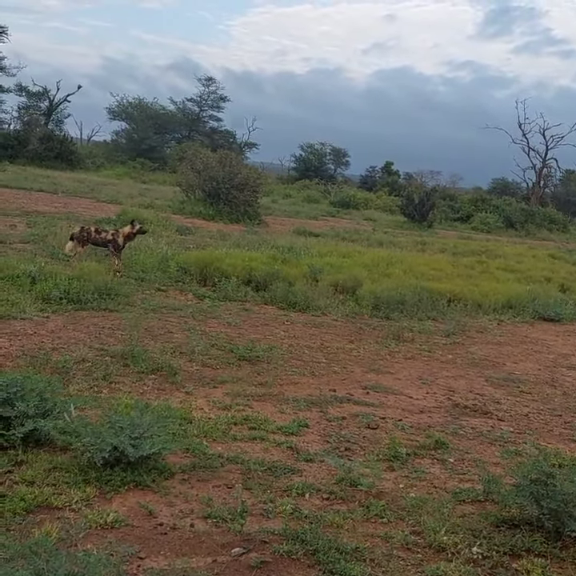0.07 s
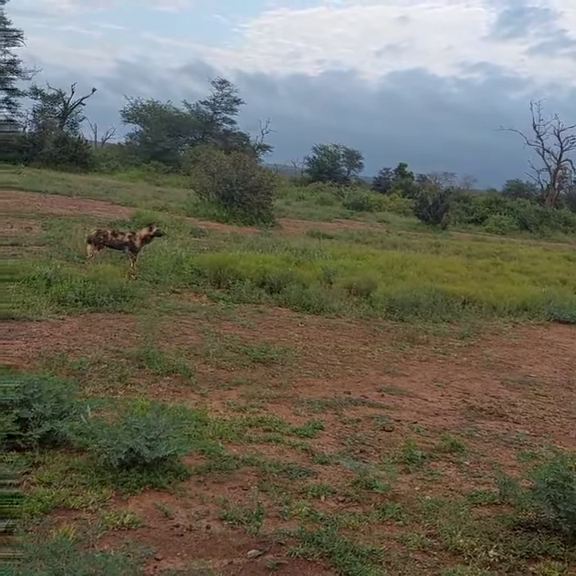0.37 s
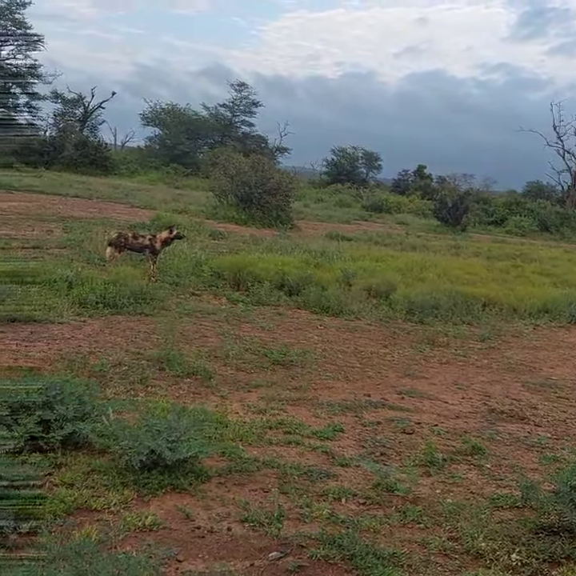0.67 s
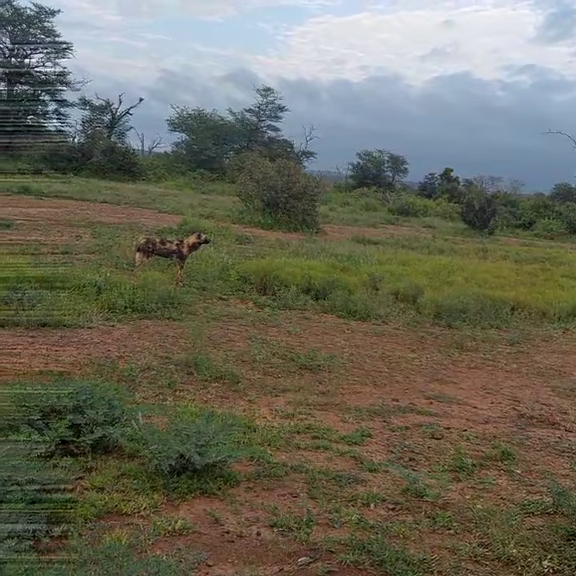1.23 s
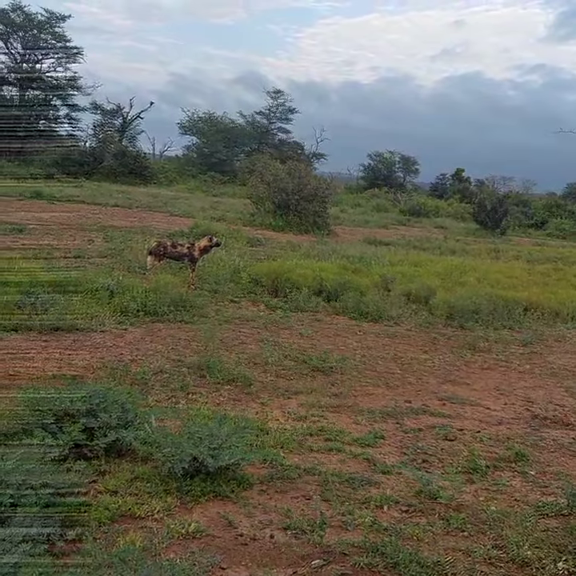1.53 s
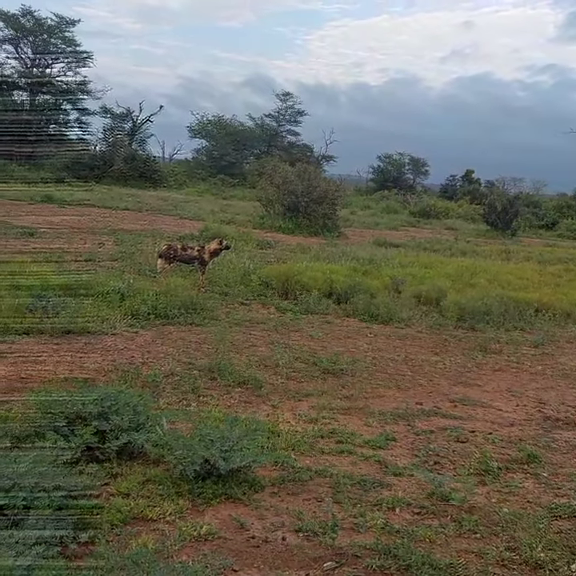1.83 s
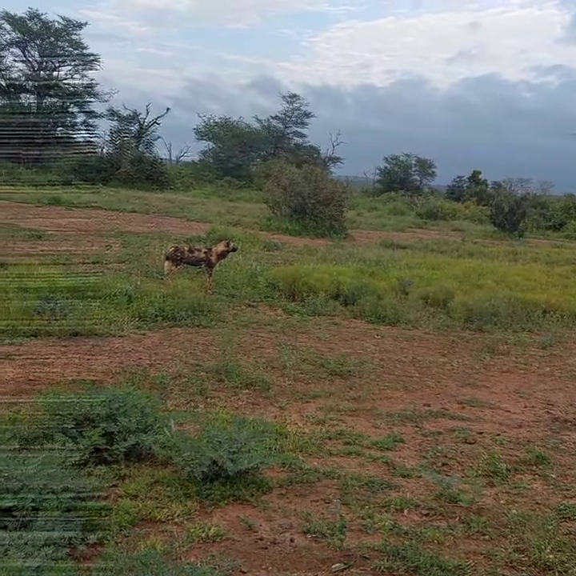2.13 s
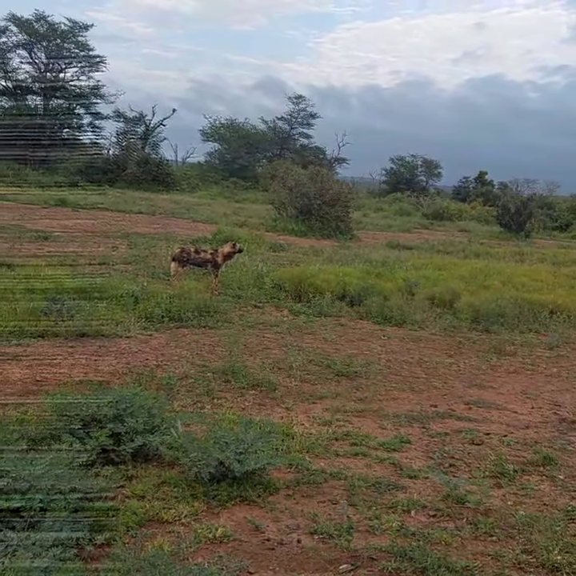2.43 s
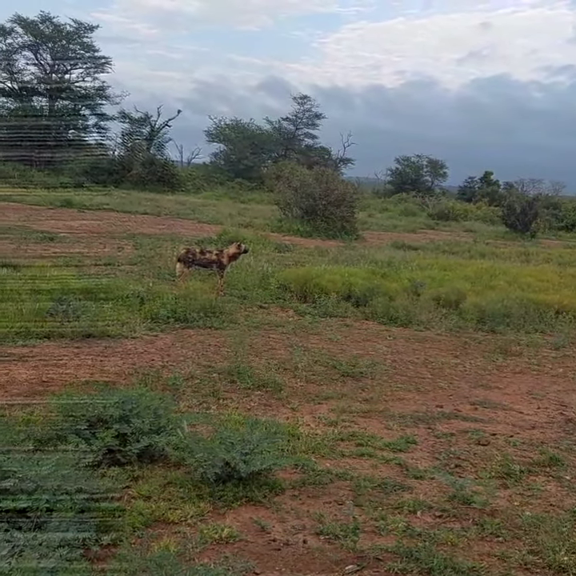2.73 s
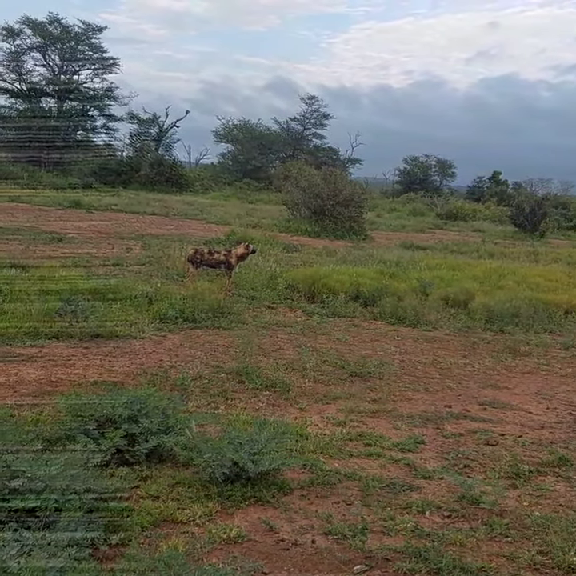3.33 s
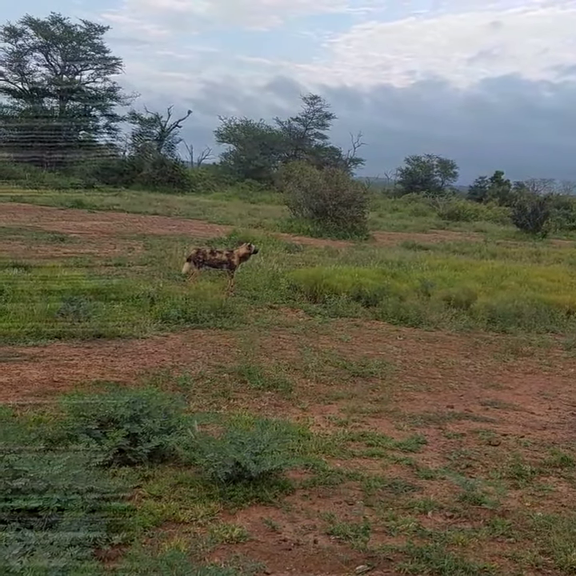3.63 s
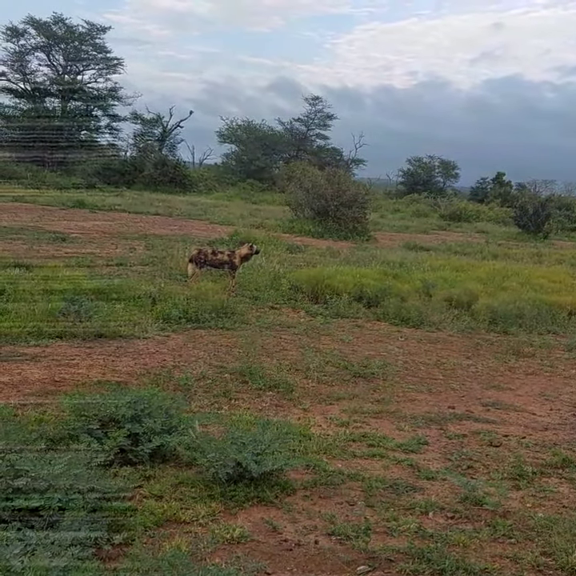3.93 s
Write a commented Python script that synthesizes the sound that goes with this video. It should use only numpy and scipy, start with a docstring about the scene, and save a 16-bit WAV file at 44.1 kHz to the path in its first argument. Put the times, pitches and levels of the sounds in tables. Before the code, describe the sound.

Birds chirp and whistle all around an open grassy plain. Soft ticks come first, then a held note, a warble and a raspy scolding run, while distant birds twitter and low wind buffets the microphone in gusts.

```python
"""Open savanna, on a camera microphone, with small birds near and far and light gusts on the right port.
Thin falling whistles come from all around. One bird buzzes and chucks, one scolds from deep in a bush,
and on the right one ticks and one holds a note and warbles. Bushes scatter each call, trees echo it.
Further out are low pips, a faint coo and two twittering flocks, over the steady hush of the air."""
import sys
import numpy as np
from scipy import signal
from scipy.fft import rfft, irfft
from scipy.io import wavfile
from scipy.ndimage import uniform_filter1d

SR = 44100
rng = np.random.default_rng(int(sys.argv[2]) if len(sys.argv) > 2 else 0)


def wrap_up_sound(samples):
    """Save the sound to the file named by the first command line argument, as 16-bit audio."""
    columns = np.atleast_2d(samples).T
    # keep every value between -1 and 1, then stretch to whole-number steps
    tamed = np.clip(columns, -1, 1)
    steps = np.round(tamed * 32767).astype(np.int16)
    wavfile.write(sys.argv[1], SR, steps)


N = 176400
TURN, TIME, HZ = 2 * np.pi, np.arange(N) / SR, np.fft.rfftfreq(N, 1 / SR)
PORT_LEAD_S = 6e-5  # a call from the left reaches the left port this much sooner

# The hush of the plain. Each row: frequency in Hz, relative spectral level in dB.
AIR_SPECTRUM = [(25, -9), (250, -0.5), (400, -6.5), (600, -5), (800, -9), (1400, -12.5), (2800, -15.5),
                (4000, -12), (5200, -27.5), (6300, -19.5), (9000, -20.5), (15500, -25)]
# How alike the two ports hear that hush. Each row: frequency in Hz, correlation from 0 to 1.
AIR_LIKENESS = [(500, 0.43), (1500, 0.25), (6000, 0)]
# Two far flocks, high then low. Each row: middle pitch in Hz, spread in octaves.
FLOCK_PITCHES = [(5076, 0.094), (2735, 0.18)]
# The flocks come and go. Each row: time in seconds, high flock's level in dB, low flock's level in dB.
FLOCK_LEVELS = [(.3, -79, -77), (1.098, -75, -78), (1.8, -77.5, -85), (2.75, -77.5, -79.5), (3.6, -86, -82),
                (3.9, -86, -78)]
# Gusts on the microphone. Each row: start in seconds, length in seconds, relative level in dB.
GUSTS = [(0.036, 0.089, -38.5), (0.126, 0.082, -39), (0.236, 0.17, -35.5), (0.416, 0.13, -39.5),
         (0.484, .065, -36.5), (0.548, 0.38, -49), (0.995, 0.51, -50.5), (1.416, 0.3, -52),
         (1.659, 0.1, -38.5), (1.746, 0.3, -47.5), (2.079, 0.21, -46), (2.262, 0.088, -38),
         (2.388, 0.066, -51), (2.534, 0.11, -37), (2.623, 0.069, -28.5), (2.679, 0.13, -35),
         (2.785, 0.073, -34.5), (2.864, 0.13, -43), (2.946, 0.1, -39.5), (3.099, 0.087, -42),
         (3.661, 0.21, -44.5)]
# Wind rumble at the exposed right port. Each row: frequency in Hz, relative spectral level in dB.
EXPOSED_SPECTRUM = [(22, -45.5), (45, -2.5), (75, 1.5), (120, -10.5), (180, -26), (250, -29.5),
                    (400, -51.5), (3000, -105)]
# Wind murmur at the sheltered left port. Each row: frequency in Hz, relative spectral level in dB.
SHELTERED_SPECTRUM = [(20, -3.5), (60, 2.5), (150, -11.5), (280, -15.5), (900, -44)]
# Low pips on the right. Each row: start in seconds, top pitch in Hz, level in dB.
LOW_PIPS = [(.07, 1277, -70.5), (0.267, 1248, -74)]
# Soft chucks on the left. Each row: start in seconds, level in dB.
CHUCKS = [(0.305, -66.5), (0.368, -68), (0.439, -68.5), (0.526, -65), (0.594, -68.5), (0.664, -70)]
# The course of the rising buzz. Each row: time in seconds, middle pitch in Hz, level in dB.
BUZZ_CURVE = [(.03, 3823, -72), (.125, 3915, -64), (.21, 4353, -64.5), (.26, 4930, -80)]
# The course of the held note. Each row: time in seconds, pitch in Hz, level in dB.
HELD_CURVE = [(1.185, 2510, -72), (1.203, 2438, -60), (1.217, 2436, -70), (1.238, 2496, -54.5),
              (1.279, 2474, -51), (1.295, 2390, -75), (1.32, 2367, -56), (1.36, 2402, -72)]
# The warble after it. Each row: time in seconds, middle pitch in Hz, relative level in dB.
WARBLE_CURVE = [(1.355, 1966, -83), (1.372, 1917, -63), (1.46, 1827, -65), (1.565, 1816, -67.5),
                (1.6, 1806, -91)]
# Harsh scolding notes. Each row: start in seconds, level in dB.
SCOLDS = [(2.064, -64.5), (2.125, -57.5), (2.189, -57.5), (2.25, -56), (2.314, -56.5), (2.381, -56.5),
          (2.452, -64.5)]
# The rasp in each scold. Each row: frequency in Hz, relative spectral level in dB.
RASP_SPECTRUM = [(1800, -34), (3800, 3.5), (7800, 5), (9000, -11), (11600, -5.5), (13000, -17)]
# Whistles all around. Each row: start and length in seconds, first and last pitch in Hz, level in dB,
# left over right in dB, gain of the scattered sound in dB.
WHISTLES = [(.16, 0.17, 3570, 2800, -71, 8, -10), (0.505, 0.072, 3750, 3170, -63, 8.5, -13),
            (0.59, 0.13, 6160, 4544, -57.5, 6, -12.5), (0.84, 0.064, 3520, 3117, -68.5, 10, -8.5),
            (0.904, .125, 3120, 2107, -78.5, 0, -8), (0.909, 0.13, 6220, 4220, -59.5, 7, -5.5),
            (1.155, 0.036, 4860, 4835, -57.5, 9, -6.5), (1.541, 0.095, 4740, 3625, -63, -4, -7),
            (1.781, 0.043, 3350, 2620, -66, 1, -1.5), (1.867, 0.11, 4515, 3590, -56.5, -1.5, -13),
            (2.694, 0.13, 2515, 2270, -75.5, -1, -6.5), (2.929, 0.054, 4510, 3680, -75, -1, -9),
            (3.191, 0.093, 4770, 3660, -76, -3, -15), (3.3, 0.11, 5840, 4160, -71.5, 1, -17),
            (3.485, 0.061, 4630, 3550, -72.5, -2, -7.5), (3.657, 0.085, 3096, 2430, -82, 0, 6.5),
            (3.671, 0.078, 3860, 2850, -77, 1, 0.5), (3.753, 0.086, 4660, 3690, -70, -3, -9),
            (3.781, 0.085, 5750, 4060, -64, -2, -13.5), (3.956, 0.029, 5550, 4770, -65, -5, -9.5)]


def amp(db):
    """Decibels to gain."""
    return 10 ** (np.asarray(db) / 20)


def unit(x):
    """Scales to rms 1."""
    return x / np.std(x)


def across_spectrum(points):
    """Joins (Hz, value) points over every frequency, on a log axis."""
    hz, value = np.transpose(points)
    return np.interp(np.log1p(HZ), np.log1p(hz), value)


def follow(points):
    """Start time, then each column of a curve, sample by sample."""
    times, *columns = np.transpose(points)
    t = TIME[(TIME >= times.min()) & (TIME < times.max())]
    return [times.min()] + [np.interp(t, times, column) for column in columns]


def progress(length_s):
    """Runs from 0 to 1 over a length of time."""
    return TIME[:int(length_s * SR)] / length_s


def swell(u, crest, steep):
    """Rises to 1 at the crest and falls again as u runs from 0 to 1."""
    return abs(np.sin(np.pi * np.interp(u, [0, crest, 1], [0, .5, 1]))) ** steep


def drift(size, rate_hz):
    """A smooth random wander of rms about 1, up to a rate."""
    return unit(irfft(rfft(rng.standard_normal(N)) / (1 + (HZ / rate_hz) ** 4)))[:size]


def noise(spectrum):
    """Noise of rms 1 with a given spectral shape."""
    return unit(irfft(rfft(rng.standard_normal(N)) * amp(across_spectrum(spectrum))))


def tone(hz):
    """A sine of rms 1 along a pitch curve."""
    return unit(np.sin(TURN * np.cumsum(hz) / SR))


def shaken(hz, depth, rate_hz):
    """An unsteady pitch curve: slow shaking wavers, fast shaking sounds hoarse."""
    return hz * np.exp(depth * drift(len(hz), rate_hz))


def panned(x, pan_db):
    """Two channels, the left louder by pan_db."""
    side = np.sqrt(amp(pan_db))
    return np.array([x * side, x / side])


def add(mix, start_s, sound):
    """Mixes a sound in at a time."""
    part = mix[..., round(start_s * SR):][..., :sound.shape[-1]]
    part += sound[..., :part.shape[-1]]


def placed(calls):
    """Lays (start in seconds, sound) pairs out on two channels."""
    mix = np.zeros((2, N))
    for start, sound in calls:
        add(mix, start, sound)
    return mix


def direct(x, lead_s):
    """The straight path to the microphone: the right port hears it lead_s after the left."""
    return np.array([x[0], irfft(rfft(x[1]) * np.exp(-1j * TURN * HZ * lead_s))])


def scattered(x, bush_t60_s=0.13, tree_t60_s=0.55, tree_db=-10.5):
    """Bushes scatter a sound briefly and far trees add a longer, weaker tail."""
    t = TIME[:SR]
    fade = amp(-60 * t / bush_t60_s) + amp(tree_db - 60 * t / tree_t60_s)
    ports = [signal.fftconvolve(port + x.mean(0), rng.standard_normal(SR) * fade)[:N] for port in x]
    return np.array(ports) / np.linalg.norm(fade)


def outdoors(calls, lead_s, wet_db):
    """Calls reach the microphone directly and through the bushes; more wet_db sounds further off."""
    mix = placed(calls)
    return direct(mix, lead_s) + amp(wet_db) * scattered(mix)


def air(db=-75.5):
    """The steady hush of the plain, partly shared by the two ports in the lows."""
    angle = np.arccos(across_spectrum(AIR_LIKENESS))
    left = noise(AIR_SPECTRUM)
    right = irfft(np.cos(angle) * rfft(left) + np.sin(angle) * rfft(noise(AIR_SPECTRUM)))
    return amp(db) * np.array([left, right])


def cooing(hz=555, db=-90, waver=0.0398, swell_db=4):
    """A faint wavering coo, like doves very far off."""
    level = amp(db + swell_db * drift(N, 4.4))
    voice = level * tone(shaken(np.full(N, hz), waver, 25))
    return outdoors([(0, voice)], PORT_LEAD_S, wet_db=-9)


def chorus(chirps_per_flock=900, length_s=0.03, fall=0.046):
    """Two far flocks: little falling chirps blurred into a soft wash by the distance."""
    u, flocks = progress(length_s), []
    glide = 1 + fall * (.5 - u)
    times, *levels = np.transpose(FLOCK_LEVELS)
    for (middle_hz, octaves), db in zip(FLOCK_PITCHES, levels):
        pitches = middle_hz * 2 ** (octaves * rng.standard_normal(chirps_per_flock))
        calls = [(k * N / SR / chirps_per_flock, np.sin(np.pi * u) * tone(hz * glide))
                 for k, hz in enumerate(pitches)]
        wash = unit(outdoors(calls, PORT_LEAD_S, wet_db=13.5))
        flocks.append(amp(np.interp(TIME, times, db)) * wash)
    return sum(flocks)


def wind(lull_db=-66.5, right_db=2.0, left_db=-20, left_exponent=0.18, lumps_db=2.5, eddy_s=0.059):
    """Gusts of eddies thump the right port; the sheltered left port only murmurs."""
    force = np.full(N, amp(lull_db))
    for start, length, db in GUSTS:
        add(force, start, amp(db) * swell(progress(length), 0.19, 0.7))
    rumble, window = noise(EXPOSED_SPECTRUM), int(eddy_s * SR)
    envelope = uniform_filter1d(uniform_filter1d(abs(rumble), window), window)
    eddies = unit(rumble / envelope)  # evened out, so the gusts shape the level
    right = eddies * force * amp(right_db + lumps_db * drift(N, 24.0))
    sheltered_force = force.mean() * (force / force.mean()) ** left_exponent
    left = noise(SHELTERED_SPECTRUM) * amp(left_db) * sheltered_force
    return np.array([left, right])


def pips(length_s=0.033, rise=0.15, first_s=2.06, every_s=0.15, count=12,
         series_hz=1960, series_db=-78, loudest_s=2.5, fade_db_per_s=7):
    """Two low upward pips on the right; later a far bird repeats a higher one at an even pace."""
    u = progress(length_s)
    envelope, glide = swell(u, 0.9, 0.66), np.exp(rise * (u - 1))
    series = [(start, series_hz, series_db - fade_db_per_s * abs(start - loudest_s))
              for start in first_s + every_s * np.arange(count)]
    calls = [(start, panned(amp(db) * envelope * tone(hz * glide), -8.5))
             for start, hz, db in list(LOW_PIPS) + series]
    return outdoors(calls, PORT_LEAD_S, wet_db=-3)


def chips(first_s=0.025, every_s=0.067, count=8, length_s=0.019, from_hz=2400, fall=0.22,
          db=-72, loudest_s=.31, fade_db_per_s=26, third_db=-7):
    """A small bird on the right ticks out an even run of falling chips that grows and fades."""
    u = progress(length_s)
    hz = from_hz * np.exp(-fall * u)
    voice = tone(hz) + amp(third_db) * (1 - u) * tone(3 * hz)
    chip = panned(np.sin(np.pi * u) * voice, -5)
    calls = [(start, amp(db - fade_db_per_s * abs(start - loudest_s)) * chip)
             for start in first_s + every_s * np.arange(count)]
    return outdoors(calls, -PORT_LEAD_S, wet_db=1.5)


def chucks(length_s=0.0315, from_hz=2980, fall_hz=330, rough=0.054):
    """A run of short, soft, hoarse notes some way off on the left."""
    u, calls = progress(length_s), []
    for start, db in CHUCKS:
        voice = swell(u, 0.31, 0.66) * tone(shaken(from_hz - fall_hz * u, rough, 590))
        calls.append((start, panned(amp(db) * voice, 17.5)))
    return outdoors(calls, PORT_LEAD_S, wet_db=-6.5)


def buzz(rate_hz=64, depth_hz=300, rough=0.079, low_ratio=.63, low_db=-9):
    """Just left of centre, a rising note shaken by a fast trill, with a weaker second voice below."""
    start, hz, db = follow(BUZZ_CURVE)
    trill = depth_hz * np.sin(TURN * rate_hz * TIME[:len(hz)])
    hz = shaken(hz + trill, rough, 600)
    voice = amp(db) * (tone(hz) + amp(low_db) * tone(low_ratio * hz))
    return outdoors([(start, panned(voice, 2.3))], PORT_LEAD_S, wet_db=-8.5)


def songster(rate_hz=21.5, depth_hz=240, rough=0.03, upstroke_s=1.422, stroke_db=3,
             upper_ratio=1.42, upper_db=-13, lead_s=-1.1e-4):
    """A bird on the right holds a clear note, then warbles in two voices, loudest on each upstroke."""
    start, hz, db = follow(HELD_CURVE)
    note = amp(db) * tone(shaken(hz, 0.011, 150))
    held = outdoors([(start, panned(note, -7.5))], lead_s, wet_db=-12.5)
    start, hz, db = follow(WARBLE_CURVE)
    phase = TURN * rate_hz * (start + TIME[:len(hz)] - upstroke_s)
    hz = hz + depth_hz * np.sin(phase)
    lower = amp(stroke_db * (np.cos(phase) - 2.5)) * tone(shaken(hz, rough, 260))
    upper = amp(upper_db) * tone(shaken(upper_ratio * hz, 0.083, 500))
    warble = panned(amp(db) * (lower + upper), -6.0)
    return held + outdoors([(start, warble)], lead_s, wet_db=-5.0)


def scolding(length_s=0.032, drop_hz=2750, rest_hz=4250, drop_s=0.0029, rough=0.0676,
             rasp_db=-12, rasp_s=0.04):
    """Deep in a bush, each note snaps down to a hoarse pitch and opens into a rasp that outlasts it."""
    calls, u, rasp_u = [], progress(length_s), progress(rasp_s)
    hz = rest_hz + drop_hz * np.exp(-u * length_s / drop_s)
    for start, db in SCOLDS:
        voice = swell(u, 0.3, 0.92) * tone(shaken(hz, rough, 840))
        rasp = amp(rasp_db) * swell(rasp_u, 0.38, 0.77) * noise(RASP_SPECTRUM)[:len(rasp_u)]
        calls += [(start, panned(amp(db) * part, -2.6)) for part in (voice, rasp)]
    return outdoors(calls, -PORT_LEAD_S, wet_db=-6.0)


def whistles(sag=0.06, wobble=0.006, flutter_db=3.2, overtone_db=-35):
    """Nearly pure notes all around swell and flutter as they slide down; the far ones blur and linger."""
    calls, blurs = [], []
    for start, length, from_hz, to_hz, db, pan_db, wet_db in WHISTLES:
        u = progress(length)
        slide = u + sag * np.sin(np.pi * u)
        hz = shaken(from_hz + (to_hz - from_hz) * slide, wobble, 150)
        effort = swell(u, crest=0.8, steep=1.1) * amp(flutter_db * drift(len(u), 80))
        voice = tone(hz) + amp(overtone_db) * effort * tone(2 * hz)  # brighter with effort
        note = panned(amp(db) * effort * voice, pan_db)
        calls.append((start, note))
        blurs.append((start, amp(wet_db) * note))
    return direct(placed(calls), PORT_LEAD_S) + scattered(placed(blurs))


def scene():
    """Birds near and far, wind and air, as they meet at the microphone."""
    nearer_birds = whistles() + scolding() + chucks() + chips() + buzz() + songster()
    far_birds = pips() + chorus() + cooing()
    return nearer_birds + far_birds + wind() + air()


def record(dry, edge_hz=15700):
    """The camera's recorder cuts off the top of the treble."""
    lowpass = signal.firwin(511, edge_hz, window=("kaiser", 9), fs=SR)
    return signal.oaconvolve(dry, lowpass[None], "same")


dry = scene()
out = record(dry)
wrap_up_sound(out)
```